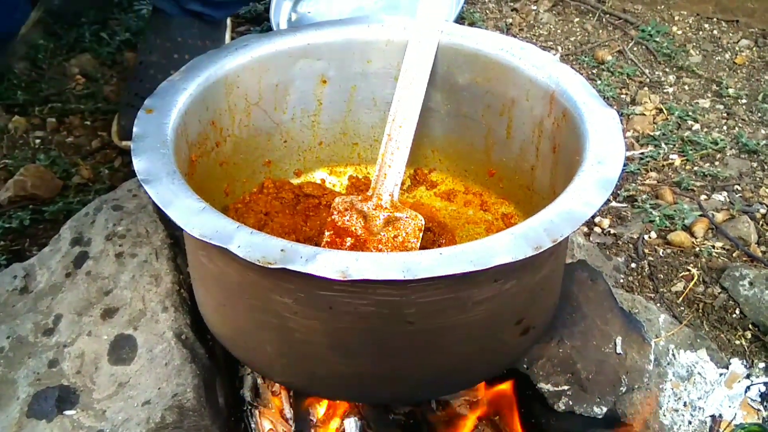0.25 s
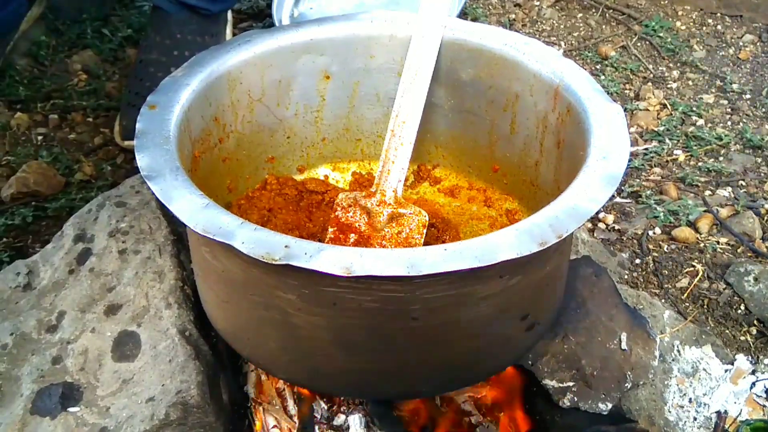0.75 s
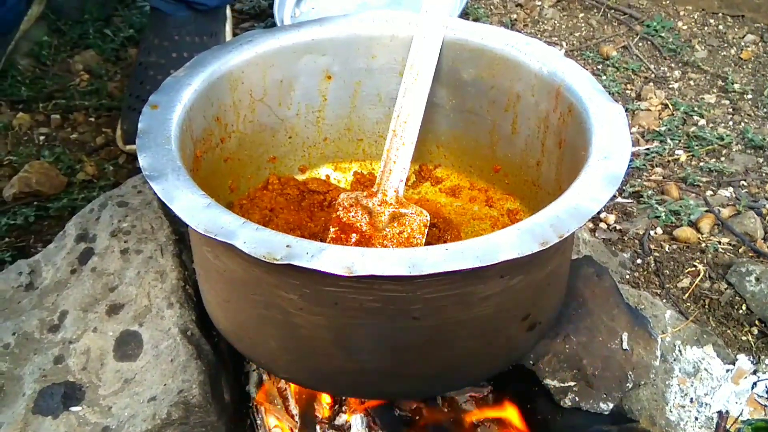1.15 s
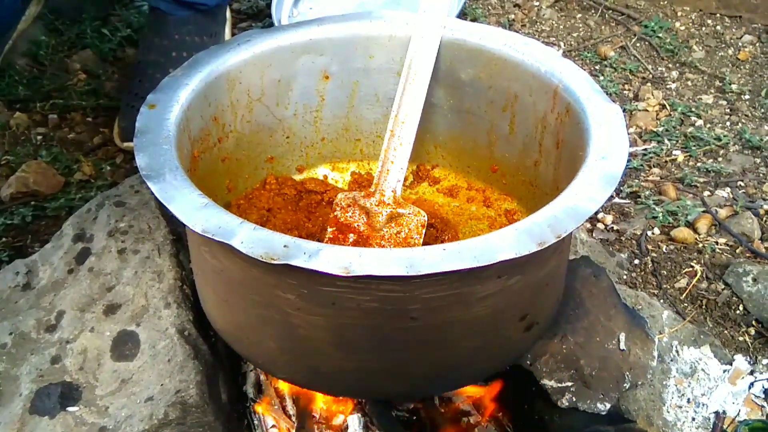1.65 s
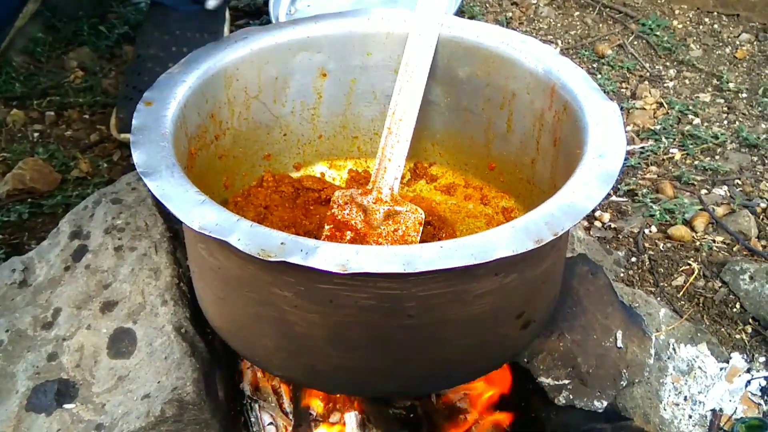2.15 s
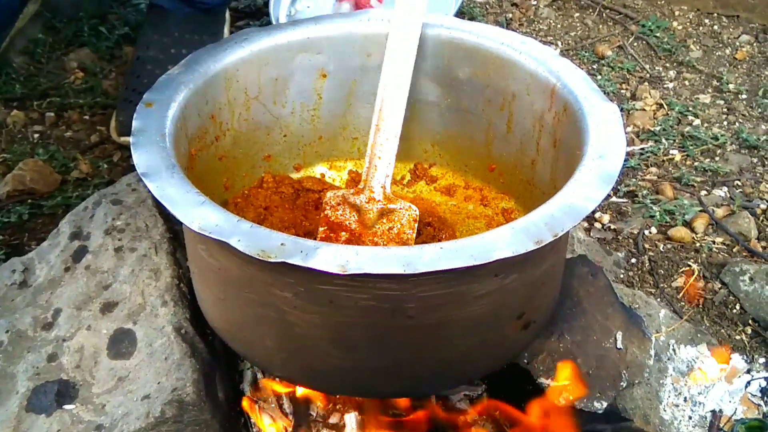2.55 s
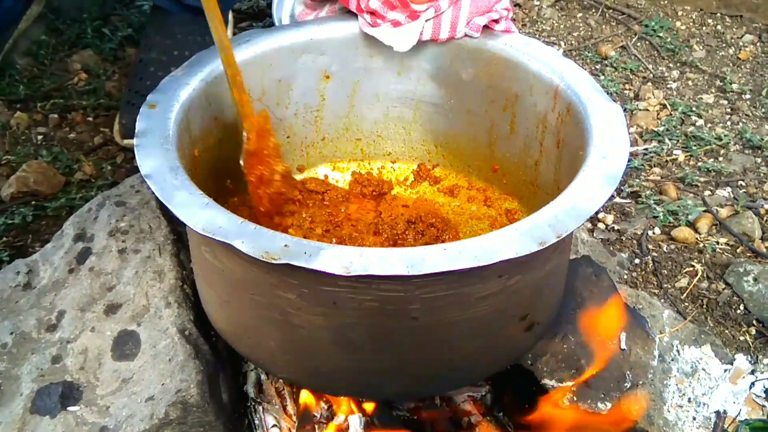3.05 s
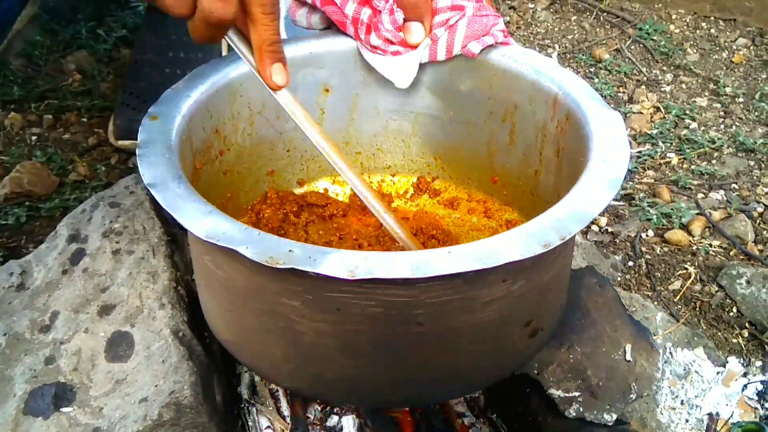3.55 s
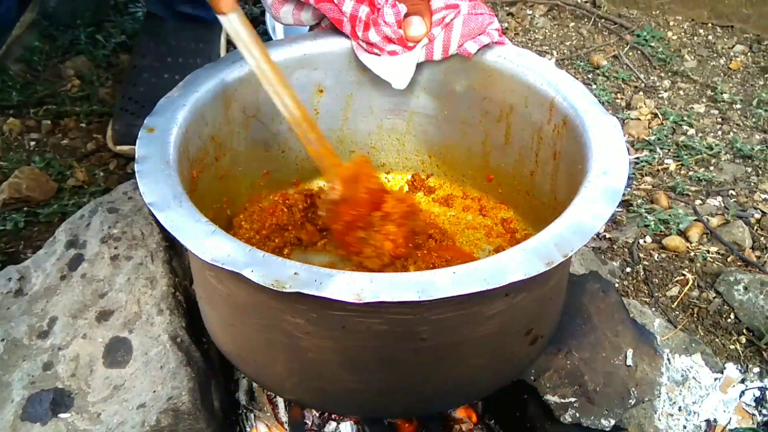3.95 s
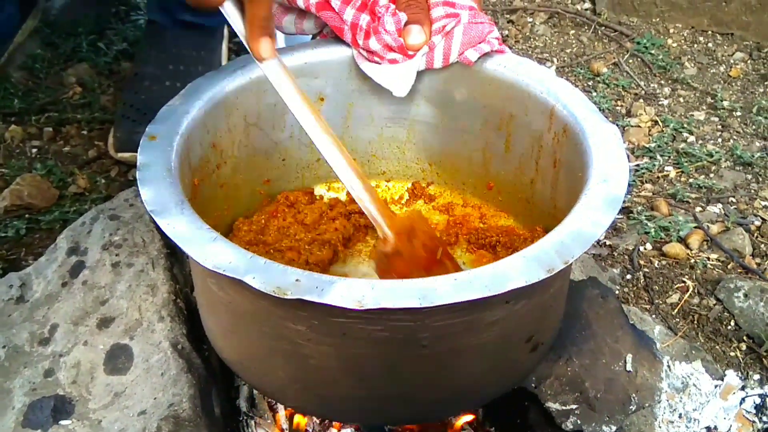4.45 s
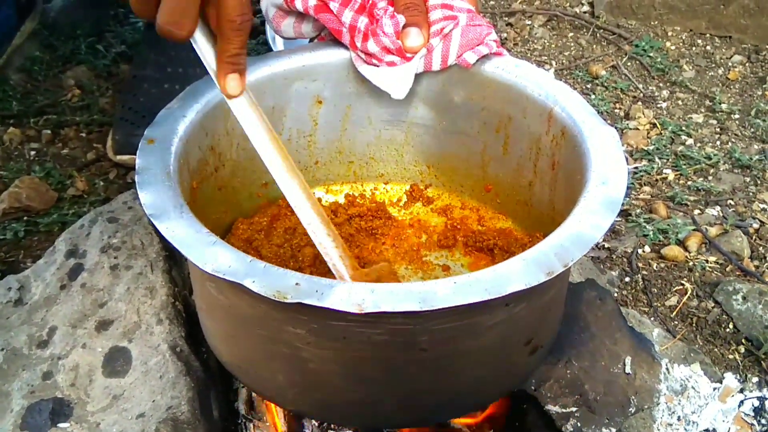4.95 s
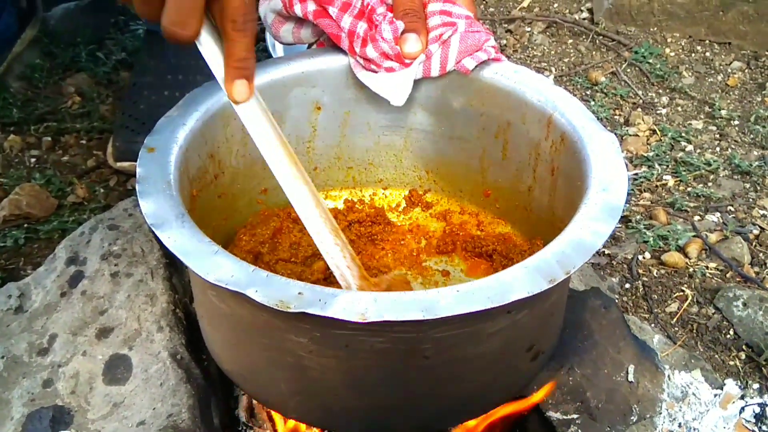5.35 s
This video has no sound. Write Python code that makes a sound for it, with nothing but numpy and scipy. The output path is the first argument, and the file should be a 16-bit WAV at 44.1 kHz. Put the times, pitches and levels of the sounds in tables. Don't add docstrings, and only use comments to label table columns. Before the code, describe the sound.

A close, dry mono pickup beside an outdoor cooking fire. Flames flutter in soft low gusts under a pot of crackling, popping sauce. Around three seconds stirring begins with a clanking knock, followed by dull bumps and hollow metallic drags. Hiss rises strongly, peaking past four seconds; the sharpest clank comes just after five, with the frying still vigorous.

```python
import sys
import numpy as np
from scipy import signal
from scipy.fft import rfft, irfft, next_fast_len
from scipy.io import wavfile
from scipy.ndimage import uniform_filter1d

SR = 44100
rng = np.random.default_rng(int(sys.argv[2]) if len(sys.argv) > 2 else 0)


def voltage_ratio(level):
    return 10 ** (np.asarray(level, float) / 20)


def put_to_file(sound):
    columns = np.atleast_2d(sound).T
    safe = np.clip(columns, -1, 1)
    whole_steps = np.round(safe * 32767)
    wavfile.write(sys.argv[1], SR, whole_steps.astype(np.int16))


N = 246959


# t/s, sizzle level/dB
FRYING_VIGOUR = [(0.0, -45.5), (0.2, -40.5), (0.5, -42.5), (1.2, -43.5), (1.75, -42.5), (2.3, -44),
                 (2.92, -44.5), (3.1, -40.5), (3.5, -35.5), (3.87, -32), (4.0, -30), (4.31, -29),
                 (4.68, -30), (5.15, -31), (5.6, -34.5)]
# f/Hz, level/dB (per Hz)
SIZZLE_COLOUR = [(1300, -54), (2830, -17), (3030, -3), (3470, 0.5), (4030, 1.5), (4320, 1.5), (7090, 2),
                 (9790, -5.5), (11500, -13), (15000, -28), (22000, -120)]
# f/Hz, level/dB (per Hz)
SPRAY_COLOUR = [(6350, -44), (10800, -8), (14500, 2), (15500, 4)]


def frying():
    sizzle_db, = in_time(FRYING_VIGOUR)
    lead_s = 0.1
    ahead_db = np.pad(sizzle_db, (0, N), "edge")[int(lead_s * SR):][:N]
    calm_db, calm_spray_db, spray_db_per_db = -40, -59.5, 1.21
    spray_db = calm_spray_db + spray_db_per_db * (ahead_db - calm_db) + 1.0 * drift(3.3)

    flicker = voltage_ratio(1.9 * drift(28))
    hiss = rms_one(grains(9000 * flicker, spread_db=2.0))
    clicks = grains(900 * flicker, spread_db=5.5)
    crackle = rms_one(bubbles(clicks, 2940, 11200, cycles=4.3, count=14))
    share = 0.9 * voltage_ratio(-0.8 * (sizzle_db + 43))
    both = (hiss + share * crackle) / np.hypot(1, share)

    sizzle = rms_one(coloured(both, SIZZLE_COLOUR))
    spray = rms_one(coloured(both, SPRAY_COLOUR))
    bright = rms_one(signal.lfilter([1, -1], [1], sizzle))
    bared = np.clip(0.019 * (sizzle_db + 42.5), 0, 1)
    sizzle = sizzle + bared * (bright - sizzle)
    return voltage_ratio(sizzle_db + 1.0) * sizzle + voltage_ratio(spray_db) * spray


# t/s, peak level/dB, f/Hz
RESTING_POPS = [(0.037, -13, 3760), (0.0562, -17.5, 8700), (0.0884, -16.5, 4600), (0.1987, -19.5, 6230),
                (0.319, -20, 4500), (0.386, -16.5, 6200), (0.436, -17, 6050), (0.491, -19, 4930),
                (0.5585, -10.5, 3850), (0.639, -20, 3670), (0.6614, -20.5, 3640), (0.695, -19, 5100),
                (0.8325, -19, 5200), (0.865, -17.5, 5240), (1.0003, -22.5, 3960), (1.0627, -20, 7700),
                (1.094, -19.5, 4010), (1.3746, -22.5, 4870), (1.4437, -19.5, 6800), (1.494, -19, 7060),
                (1.67, -17, 5100), (1.72, -14, 4460), (1.731, -25, 6500), (2.0086, -9, 4280),
                (2.0775, -22, 4500), (2.3023, -14.5, 4020), (2.4155, -21, 4150), (2.5157, -20.5, 4130),
                (2.5584, -16, 5800), (2.9375, -21, 5270)]
# t/s, peak level/dB, f/Hz
BLADE_TICKS = [(3.195, -14, 4200), (3.2315, -23, 6600), (3.27, -27, 6360), (3.312, -38, 5600),
               (3.367, -20, 6860), (3.5975, -18, 7100), (3.8169, -10.5, 4500), (3.9239, -7.5, 3540),
               (4.3361, -15, 6750), (4.3717, -8.5, 6330), (4.6795, -31, 4530), (5.1614, -7.5, 6000),
               (5.165, -21, 4270), (5.3364, -16.5, 5400), (5.4136, -21, 5650)]
# t/s, peak level/dB
FLUNG_DROPS = [(0.0545, -23), (0.19, -35), (1.484, -21.5), (1.9134, -18), (1.9245, -35), (1.9614, -29),
               (2.557, -27), (2.9725, -27), (3.1946, -18), (3.6541, -21), (3.8156, -18), (3.922, -34),
               (4.2443, -32), (4.348, -23), (4.459, -25), (5.1626, -20)]


def pops():
    out, tops = np.zeros(N + 800), np.zeros(N + 800)
    t = np.arange(-200, 600) / SR
    after, before = np.maximum(t, 0), np.minimum(t, 0)
    tone_shape = np.exp(before / 0.000053 - after / 0.00039)
    fizz_shape = np.exp(before / 0.001 - after / 0.00033)
    drop_shape = np.exp(before / 0.00048 - after / 0.00068)
    for s, db, hz in RESTING_POPS + BLADE_TICKS + small_pops():
        at = max(round(s * SR) - 8, 0)
        tone = np.sin(2 * np.pi * hz * t) * tone_shape
        fizz = 0.45 * rng.standard_normal(800) * fizz_shape
        out[at:at + 800] += voltage_ratio(db + 2.5) * (tone + fizz)
    for s, db in FLUNG_DROPS:
        at = round(s * SR) + 15
        tops[at:at + 800] += voltage_ratio(db - 1.5) * rng.standard_normal(800) * drop_shape
    out, tops = out[200:N + 200], tops[200:N + 200]

    bright = steep(steep(out, 3370, "high"), 9400, "low")
    bright = bright + steep(tops + voltage_ratio(-24.0) * out, 10100, "high")
    thump = pot_wall(np.abs(out), patchy_db=7.0)
    return in_pot(bright) + voltage_ratio(-75.0) * steep(thump, 990, "high")


FAVOURED_PITCHES = [3850, 4600, 4860, 5560, 6850]


def small_pops():
    count, until_s, fade_db_per_s, detune = 210, 3.3, 2.1, 0.061
    when, size, pick, tune = rng.random((count, 4)).T
    s = until_s * when ** 1.25
    db = -27.5 + 1.5 * (2 * np.log(size + 0.028) + 1) - fade_db_per_s * s
    favoured = np.array(FAVOURED_PITCHES)[(pick * len(FAVOURED_PITCHES)).astype(int)]
    hz = favoured * (1 + detune * (2 * tune - 1))
    lead_s = np.array(RESTING_POPS)[:, 0] - s[:, None]
    just_before = ((lead_s > 0) & (lead_s < 0.014)).any(axis=1)
    return list(zip(s, np.where(just_before, -90, db), hz))


# t/s (delay), level/dB
POT_ECHOES = [(.0012, -92), (.0024, -12.5), (.0036, -11)]


def in_pot(x):
    return x + sum(voltage_ratio(db) * np.pad(x, (round(s * SR), 0))[:N] for s, db in POT_ECHOES)


# t/s, peak level/dB, f/Hz, fall by 60 dB/s, wall clatter level/dB
WALL_TAPS = [(0.556, -37, 1064, 0.046, -45), (0.733, -28.5, 820, 0.052, -88),
             (0.753, -36.5, 803, 0.21, -79), (0.777, -32, 774, 0.041, -77),
             (1.7185, -28.5, 1144, 0.074, -49.5), (1.805, -37, 1110, 0.05, -47.5),
             (2.005, -43.5, 1130, 0.29, -47), (2.554, -43.5, 1064, 0.12, -42.5),
             (3.195, -16.5, 1370, 0.025, -73), (3.202, -25, 1070, 0.11, -44),
             (3.244, -40.5, 1020, 0.19, -38.5), (3.6705, -16, 1126, 0.037, -52.5),
             (3.838, -28, 1850, 0.088, -58), (3.922, -24, 2120, 0.065, -46.5),
             (4.124, -31.5, 1607, 0.13, -63), (5.1612, -17, 2088, 0.051, -51)]
# t/s, peak level/dB, f/Hz, fall by 60 dB/s
BOTTOM_THUDS = [(3.2, -23, 520, 0.042), (3.387, -31, 500, 0.29), (3.405, -17.5, 557, 0.039),
                (3.42, -29, 628, 0.14), (3.436, -21, 556, 0.14), (3.462, -21, 540, 0.037),
                (3.536, -25, 490, .037), (3.706, -23.5, 604, 0.039), (4.003, -20.5, 545, 0.045),
                (4.169, -24, 523, 0.039), (4.183, -19, 554, .039), (4.203, -20, 540, .035),
                (4.583, -18.5, 488, 0.06), (4.61, -23, 557, 0.03), (5.116, -37.5, 510, 0.25),
                (5.232, -23, 520, .052), (5.317, -24.5, 527, 0.043), (5.4347, -21, 514, 0.042)]


def knocks():
    out, blows = np.zeros(N + 6000), np.zeros(N + 6000)
    t = np.arange(6000) / SR
    thud_clatter_db = -60
    for s, db, hz, t60, clatter_db in WALL_TAPS + [(*thud, thud_clatter_db) for thud in BOTTOM_THUDS]:
        at = round(s * SR)
        fade = voltage_ratio(db - 60 * t / max(t60, 0.01))
        rattle = rng.standard_normal(6000)
        near_pitch = signal.butter(2, [hz / 1.3, hz * 1.2], "band", fs=SR, output="sos")
        rough = rms_one(signal.sosfilt(near_pitch, rattle))
        onset = 1 - np.exp(-t / 0.00051)
        out[at:at + 6000] += fade * onset * (0.59 * np.sin(2 * np.pi * hz * t) + 0.29 * rough)
        first_touch = 1 + 0.74 * np.exp(-t / 0.00013)
        blows[at:at + 6000] += fade * rattle * voltage_ratio(clatter_db) * first_touch
    clatter = pot_wall(blows[:N], patchy_db=-1.5, count=7)
    return steep(out[:N], 3500, "low") + steep(clatter, 850, "high")


# f/Hz, width/Hz, level/dB
WALL_RINGS = [(1070, 85, 4), (1181, 160, 3.5), (1410, 220, -6), (1607, 74, -7.5), (1902, 160, -11),
              (2120, 83, -5.5), (2250, 740, -4), (2950, 185, -2.5)]


def pot_wall(blows, patchy_db, count=8):
    return body(blows, WALL_RINGS[:count], patchy_db)


# t/s, peak level/dB, fall by 60 dB/s
BLADE_CLANKS = [
    (3.1953, -16, 0.034),
    (3.2445, -28, 0.024),
    (3.9235, -19.5, 0.031),
    (5.161, -12, 0.035),
]
# f/Hz, width/Hz, level/dB
BLADE_RINGS = [(3600, 110, 3), (4127, 85, 1.5), (4500, 65, -2.5), (5300, 220, 2), (5990, 170, 3),
               (6540, 200, -2), (7200, 1200, -2)]


def clanks():
    chatter, t = np.zeros(N + 4000), np.arange(4000) / SR
    first_touch = 1 + 0.59 * np.exp(-t / 0.00062)
    for s, db, t60 in BLADE_CLANKS:
        fade = voltage_ratio(db - 60 * t / max(t60, 0.01))
        chatter[round(s * SR):][:4000] += fade * rng.standard_normal(4000) * first_touch
    return voltage_ratio(-48) * steep(body(chatter[:N], BLADE_RINGS, patchy_db=3.0), 2160, "high")


# f/Hz, width/Hz, level/dB
AIR_RINGS = [(474, 110, -1), (525, 83, 4.5), (678, 190, -1), (919, 32, -12)]


def drag():
    air_gain, wall_gain = pressure()
    slips = grains(2500 * voltage_ratio(3 * drift(20)), spread_db=-0.5)
    hollow = steep(steep(body(slips, AIR_RINGS, patchy_db=-1.0), 338, "high"), 1300, "low")
    wall = steep(steep(pot_wall(slips, patchy_db=2.6), 1237, "high"), 2630, "low")
    return voltage_ratio(0.5) * (air_gain * rms_one(hollow) + wall_gain * rms_one(wall))


# t/s, level/dB
POT_SIMMER = [(0.0, -59.5), (0.3, -65.5), (0.6, -60.5), (1.4, -66), (1.87, -61), (2.4, -67.5),
              (3.05, -62.5), (3.4, -76), (5.3, -61), (5.6, -59)]
# start t/s, length/s, level/dB, air against walls level/dB
BLADE_STROKES = [
    (3.364, 0.16, -50, 1),
    (3.582, 0.14, -51.5, -3.5),
    (3.782, 0.14, -45, 2),
    (4.048, 0.3, -42, -5.5),
    (4.484, .27, -43.5, -3),
    (4.906, 0.097, -45.5, -0.5),
    (5.139, 0.21, -43.5, -2),
]


def pressure():
    t = np.arange(N) / SR
    simmer_db, = in_time(POT_SIMMER)
    wall = voltage_ratio(simmer_db)
    air = wall * voltage_ratio(1 - 2 * t)
    rise_s, fall_s = 0.06, 0.07
    for s, length, db, air_db in BLADE_STROKES:
        edges = np.minimum((t - s) / rise_s, (s + length - t) / fall_s)
        shape = voltage_ratio(db) * np.exp(np.minimum(0, edges))
        air, wall = np.hypot(air, shape * voltage_ratio(air_db)), np.hypot(wall, shape)
    return air, wall


# f/Hz, level/dB (per Hz)
FLAME_COLOUR = [(15, -59), (25, -27), (49, -5.5), (102, 5.5), (179, -7), (218, -8.5), (435, -22.5),
                (480, -30.5), (620, -52), (1060, -120)]


def flames():
    billow, flap = gusts()
    lumps = coloured(rng.standard_normal(N) * voltage_ratio(1.43 * drift(32)), FLAME_COLOUR)
    flap = flap * voltage_ratio(1.2 * drift(9))
    deep, quick = steep(lumps, 113.0, "low"), steep(lumps, 146.4, "high")
    return billow * evened(deep) + flap * evened(quick)


# centre t/s, peak level/dB, length/s, flapping against billow level/dB
FLAME_GUSTS = [(0.095, -39, 0.057, -10.5), (0.263, -35.5, 0.087, -5), (0.46, -41.5, 0.2, 2),
               (0.636, -38, 0.071, -1.5), (0.814, -38, 0.18, -3.5), (0.97, -36.5, 0.072, -2),
               (1.022, -34, 0.023, -0.5), (1.11, -43.5, 0.078, 7.5), (1.245, -37, 0.034, -5),
               (1.42, -32.5, 0.081, -2.5), (1.59, -42, 0.025, 3), (1.79, -47, 0.23, 3.5),
               (2.043, -41.5, 0.19, -21), (2.175, -31, .07, -6), (2.234, -26.5, 0.047, -7),
               (2.783, -40, 0.31, -8), (3.13, -40, 0.28, -2), (3.458, -41, 0.16, 7),
               (3.645, -35.5, 0.14, -1.5), (3.78, -31, 0.15, -2.5), (4.13, -35.5, 0.29, -2),
               (4.364, -37.5, 0.14, 2.5), (4.48, -33, 0.042, -24), (4.57, -42, 0.15, 4),
               (4.779, -30.5, 0.1, -4.5), (4.988, -35, 0.11, -3), (5.21, -36, 0.12, -2.5),
               (5.336, -37.5, 0.11, -10), (5.45, -47, 0.028, 13), (5.502, -35, 0.088, -3.5)]


def gusts():
    t = np.arange(N) / SR
    billow, flap = voltage_ratio(-52.5) ** 2, voltage_ratio(-48.5) ** 2
    for s, db, length, flap_db in FLAME_GUSTS:
        swell = voltage_ratio(db) ** 2 * np.exp(-(2 * (t - s) / length) ** 2)
        billow, flap = billow + swell, flap + swell * voltage_ratio(flap_db) ** 2
    return np.sqrt(billow), np.sqrt(flap)


def evened(x):
    steadiness, over_s = 0.65, 0.05
    strength = np.sqrt(uniform_filter1d(rms_one(x) ** 2, size=int(over_s * SR)) + 0.01)
    return rms_one(x / strength ** steadiness)


def rms_one(x):
    return x / np.sqrt(np.mean(x ** 2) + 1e-20)


def in_time(rows):
    s, *columns = np.transpose(rows)
    return [np.interp(np.arange(N) / SR, s, c) for c in columns]


def drift(rate):
    r = np.exp(-80 * np.pi * rate / SR)
    slow = signal.lfilter([1], [1, -2 * r, r * r], rng.standard_normal(N // 40 + 2002))[2000:]
    return np.interp(np.arange(N) / 40, np.arange(len(slow)), rms_one(slow))


def coloured(x, spectrum):
    hz, level_db = np.transpose(spectrum)
    size = next_fast_len(N)
    grid = np.maximum(np.arange(size // 2 + 1) * SR / size, 1)
    gain = voltage_ratio(np.interp(np.log(grid), np.log(hz), level_db, -90, -90))
    return irfft(rfft(x, size) * gain, size)[:N]


def ring(x, hz, width):
    r, w = np.exp(-np.pi * width / SR), 2 * np.pi * hz / SR
    return signal.lfilter([0, np.sin(w)], [1, -2 * r * np.cos(w), r * r], x + 1e-18)


def grains(per_s, spread_db):
    sizes = voltage_ratio(spread_db * np.minimum(rng.exponential(1, N), 3.5)) * rng.choice([-1, 1], N)
    return sizes * (rng.random(N) < per_s / SR)


def bubbles(clicks, low_hz, high_hz, cycles, count):
    dealt = rng.integers(0, count, N)
    out = np.zeros(N)
    for k, hz in enumerate(np.geomspace(low_hz, high_hz, count)):
        out += ring(clicks * (dealt == k), hz, hz / cycles) * hz / low_hz
    return out


def body(x, modes, patchy_db):
    out = np.zeros(N)
    for k, (hz, width, db) in enumerate(modes):
        gain = (-1) ** k * voltage_ratio(db + patchy_db * drift(4.3))
        out += gain * ring(x, hz, width) * np.sqrt(width)
    return out


def steep(x, hz, kind):
    return signal.sosfilt(signal.butter(6, hz, kind, fs=SR, output="sos"), x)


def scene():
    return (frying() + pops() + knocks() + clanks() + drag() + flames()) * np.ones((2, 1))


# f/Hz, level/dB (per band)
MUTING_LEVEL = [(450, -126), (700, -97), (1100, -76), (1900, -77.5), (2500, -75.5), (2800, -62.5),
                (3250, -59.5), (4200, -65), (10000, -82), (11300, -70), (13500, -84), (15600, -75)]


def muted(x):
    hz, _, spec = signal.stft(x, SR, nperseg=2048, noverlap=1536)
    bands = spec[:1024].reshape(128, 8, -1)
    power = uniform_filter1d(np.sum(np.abs(bands) ** 2, axis=1), size=3, axis=1) + 1e-15
    waver_db = 5.5 * uniform_filter1d(rng.standard_normal(power.shape), size=5, axis=1)
    limit_db = np.interp(hz[4:1024:8], *np.transpose(MUTING_LEVEL), -150, -150)[:, None]
    limit_db = limit_db + 0.3 * (10 * np.log10(power.sum(0)) + 38)
    under_db = limit_db + waver_db - 10 * np.log10(power)
    shut = 1 / (1 + np.exp(-np.clip(under_db / 0.7, -30, 30)))
    spec[:1024] = (bands * voltage_ratio(-16 * shut)[:, None]).reshape(1024, -1)
    return signal.istft(spec, SR, nperseg=2048, noverlap=1536)[1][:N]


def band_limit(x):
    return signal.sosfilt(signal.butter(12, 16520, fs=SR, output="sos"), x)


def record(dry):
    top_cut = signal.cheby2(16, 70, 15950, fs=SR, output="sos")
    mix = signal.sosfilt(top_cut, muted(dry[0])) * np.ones((2, 1))
    return band_limit(mix)


dry = scene()
out = record(dry)
put_to_file(out)
```